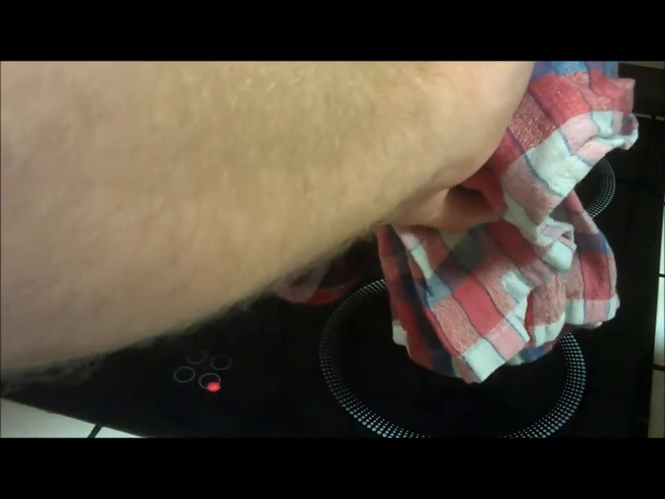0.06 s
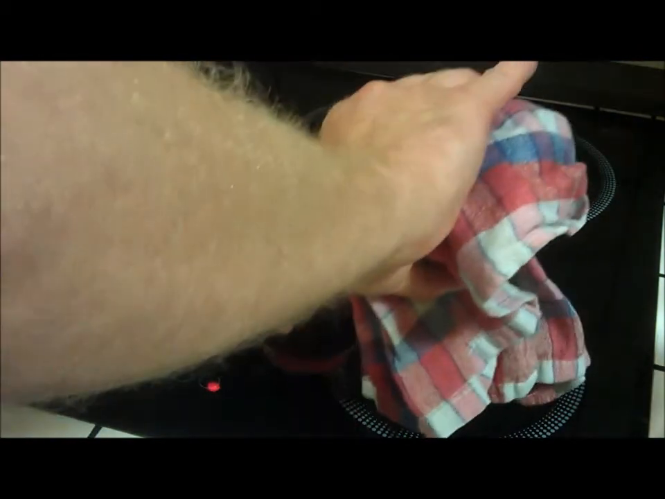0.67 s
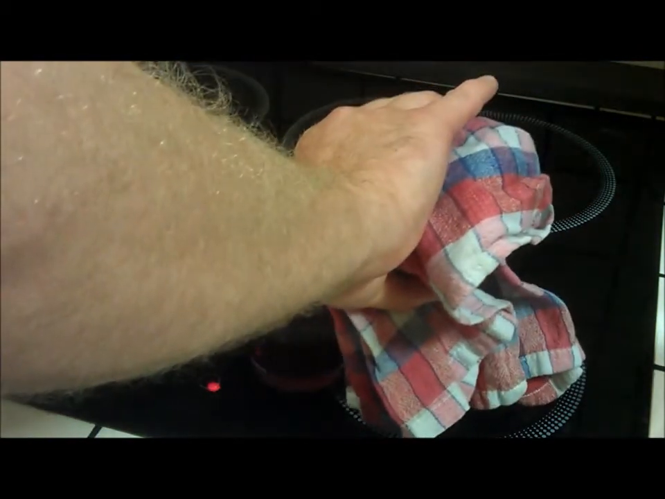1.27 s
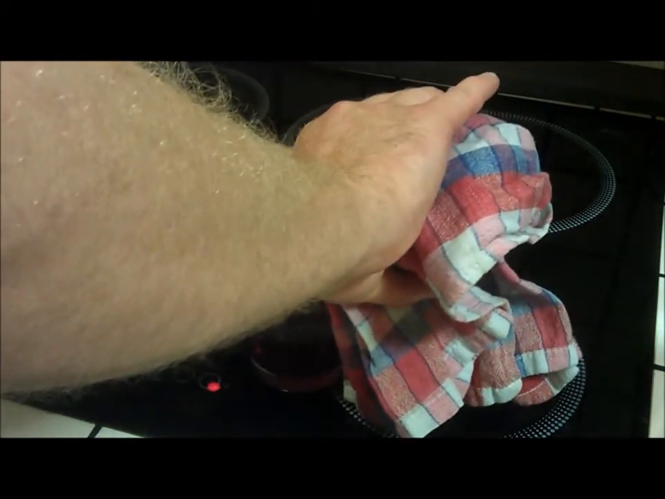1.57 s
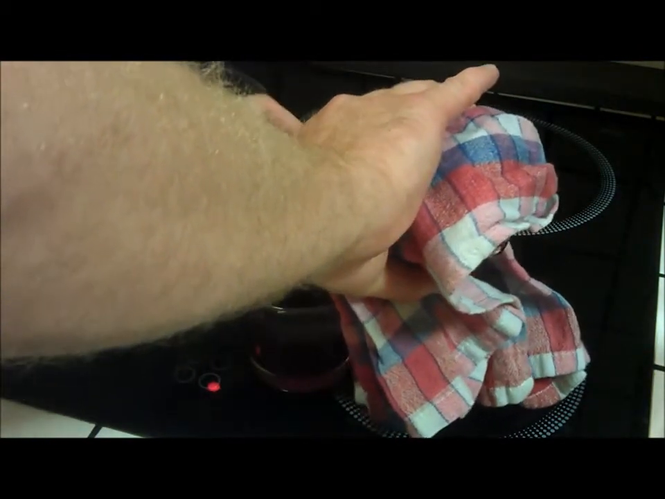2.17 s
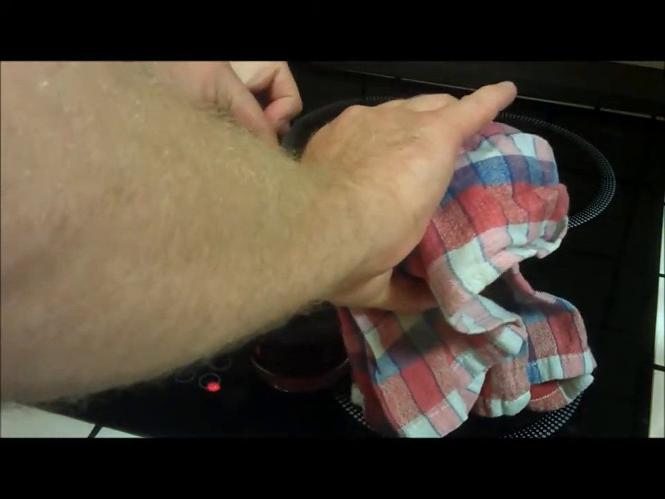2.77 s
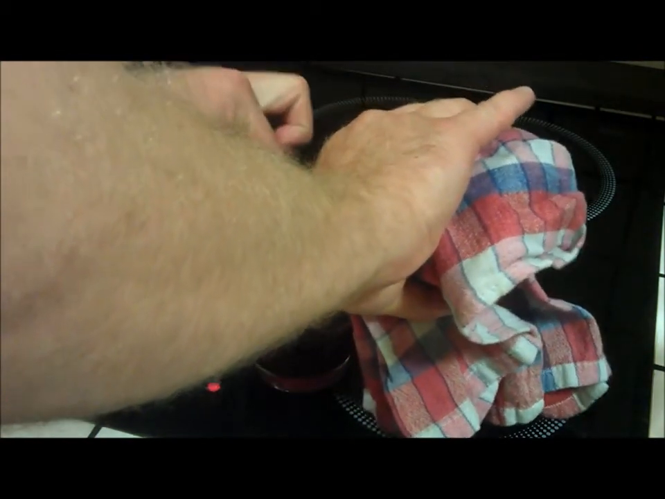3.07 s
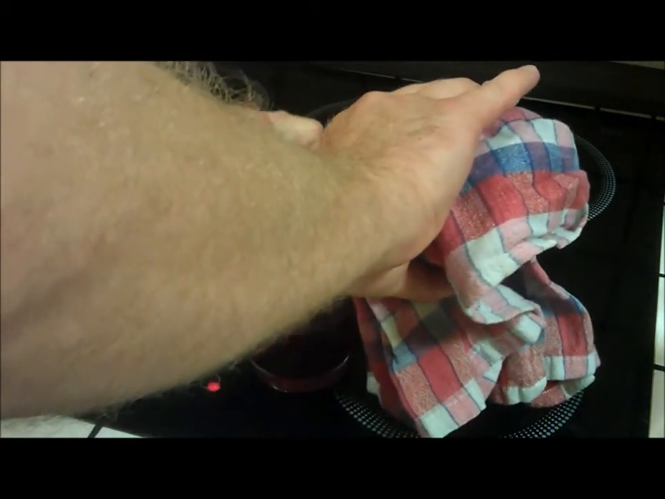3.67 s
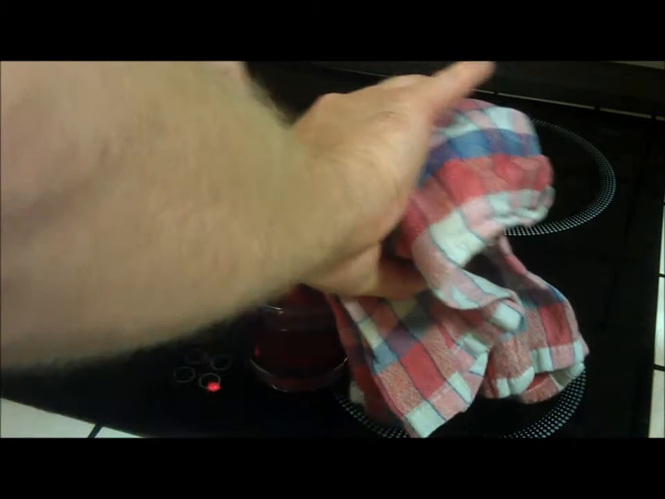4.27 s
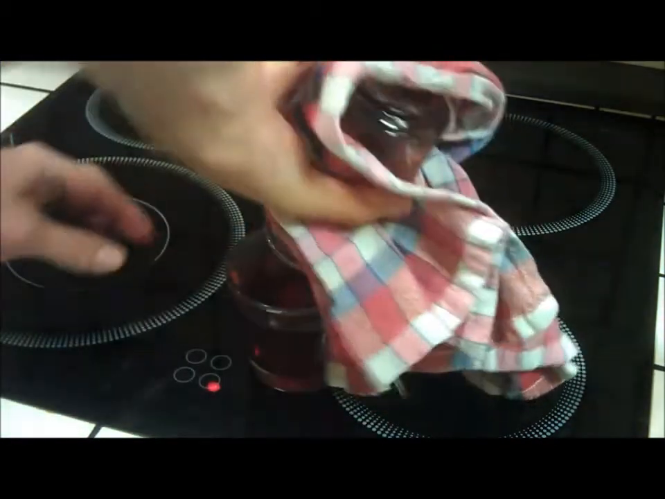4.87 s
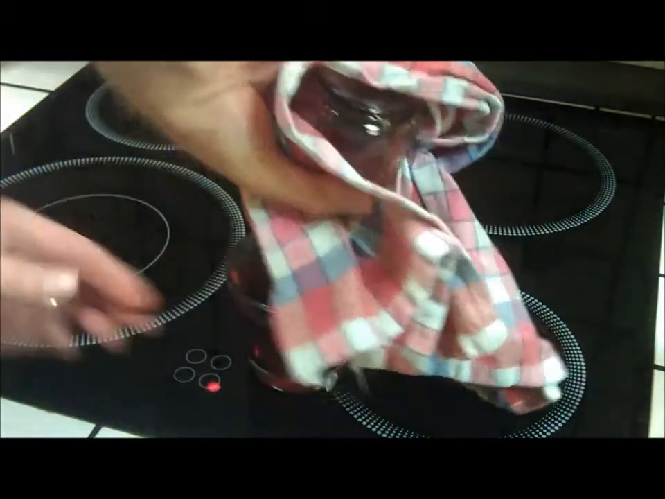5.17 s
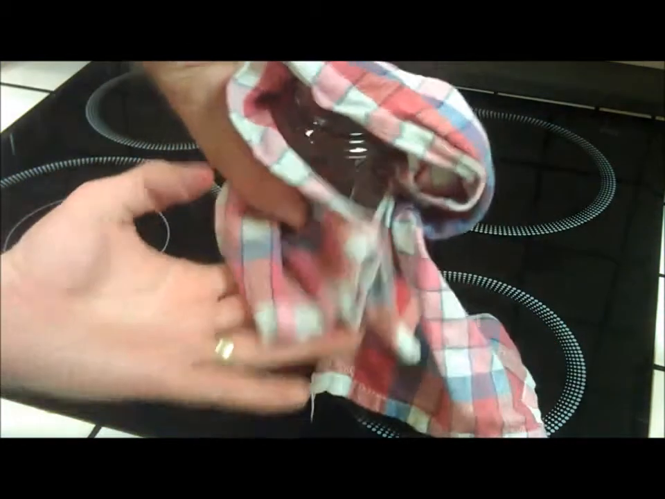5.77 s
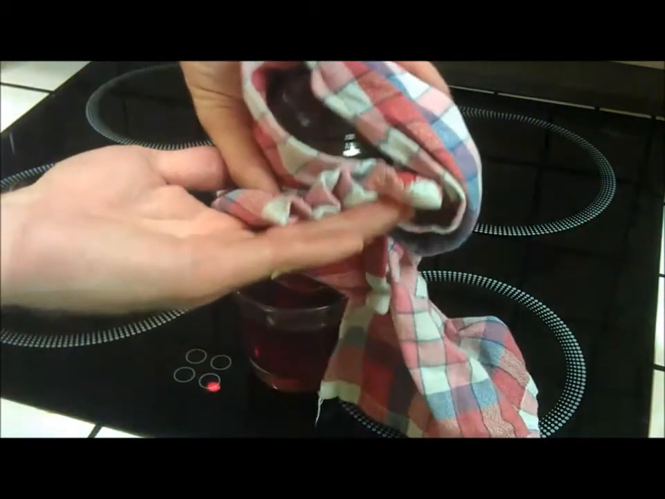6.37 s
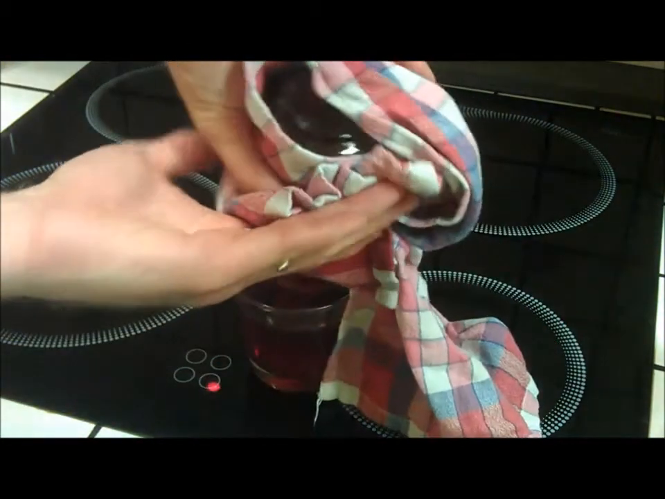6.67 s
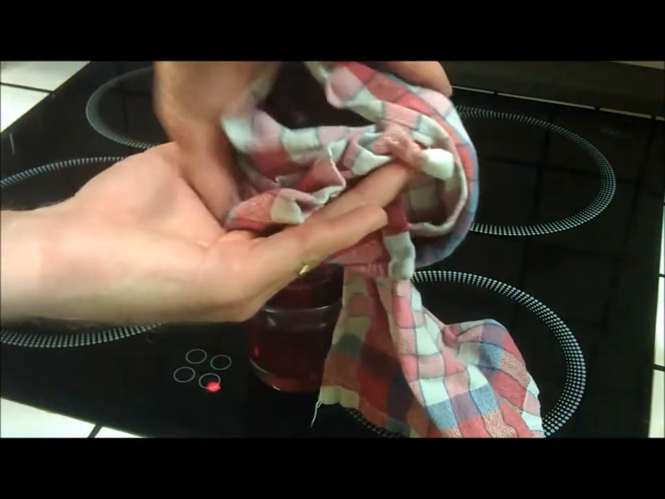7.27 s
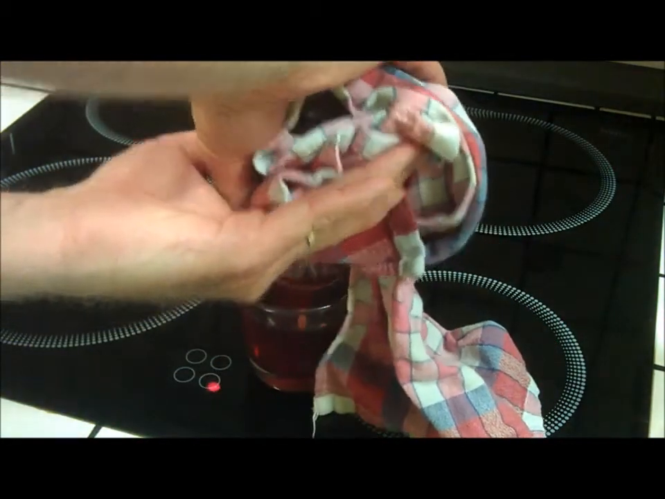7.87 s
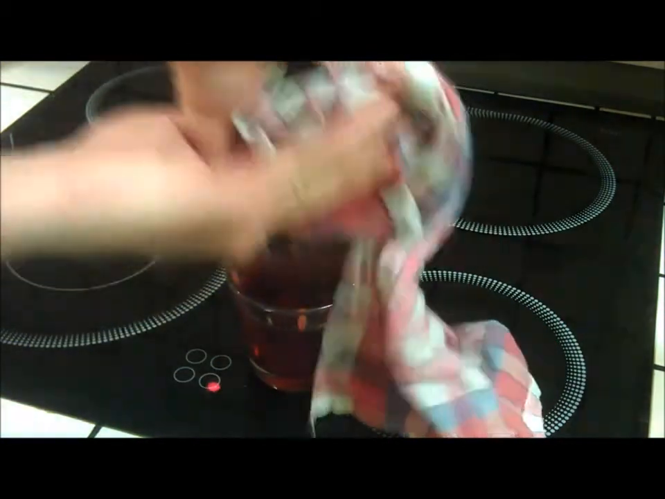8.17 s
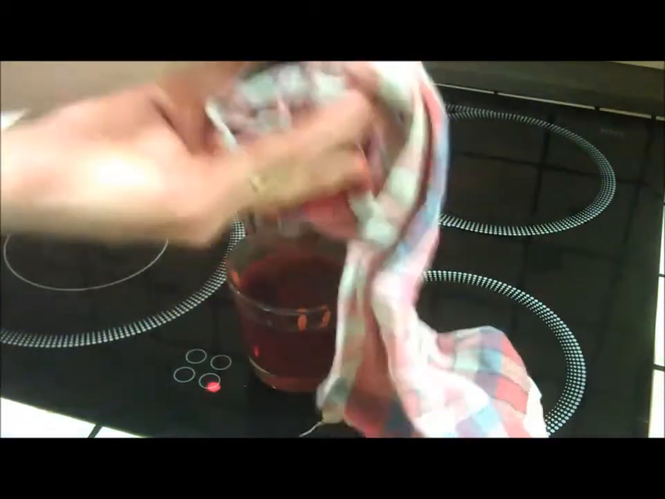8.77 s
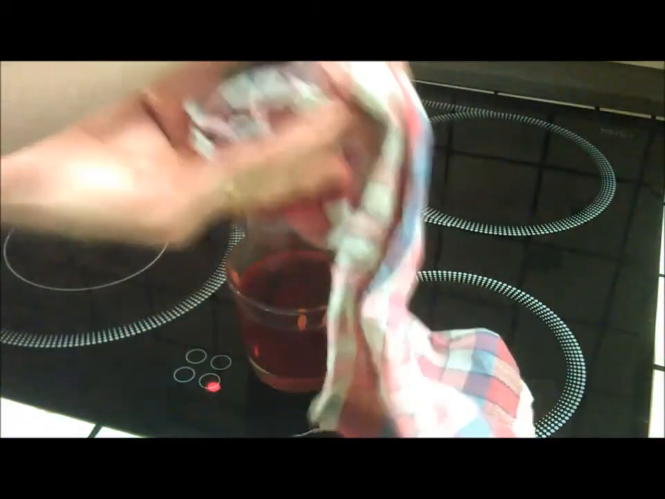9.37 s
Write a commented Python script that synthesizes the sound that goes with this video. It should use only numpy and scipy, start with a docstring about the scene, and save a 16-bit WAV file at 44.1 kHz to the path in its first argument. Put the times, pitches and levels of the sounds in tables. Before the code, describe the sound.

A close stereo microphone in a small kitchen picks up faint hiss and electric hum throughout. After a light tap at 0.5 seconds, a glass knocks sharply on a glass-ceramic cooktop at 1 second, both ringing briefly, with a duller settling knock right after. A few light, ringing clinks come at 2.7 seconds, then a low thud with a little glass ring at 3.3. A very soft hand rub follows just before 4 seconds. From about 4.3 seconds a cloth towel is pulled around a glass, its crinkling rustle strongest around 4.7 to 5.1, then thinning out by 7.3. The twisting cloth ticks and creaks from 5.1 seconds, with three tiny high squeaks near 6.1 and stronger short creaks from 6.8 to 8.3. Small clusters of hard, light glass clicks sound at 8.7 and 9.6 seconds.

```python
"""Glassware knocks on a glass-ceramic cooktop, ringing panel and glass: one sharp blow, a duller settling
knock, a later thud and a few light clinks. Then a cloth towel is pulled and twisted round a glass:
sliding folds rustle and crinkle, skidding threads squeak, stick-slip makes ticks and creaks.
Small kitchen, close stereo microphone, faint hum and hiss underneath."""
import sys
import numpy as np
from scipy import signal
from scipy.fft import rfft, irfft, next_fast_len
from scipy.io import wavfile
from scipy.ndimage import map_coordinates

SR = 44100
rng = np.random.default_rng(int(sys.argv[2]) if len(sys.argv) > 2 else 0)


def master_out(mix):
    """Clip the mix to full scale and print it as 16-bit PCM to the path in sys.argv[1]."""
    frames = np.transpose(np.atleast_2d(mix))
    ceiling = np.clip(frames, -1, 1)
    pcm = np.round(ceiling * 32767).astype(np.int16)
    wavfile.write(sys.argv[1], SR, pcm)


N = 425124
TIME_S = np.arange(N) / SR
RING_N = SR * 3 // 4
RING_S = np.arange(RING_N) / SR


# start_s, panel_db, glass_db, contact_cutoff_hz, glass_rattle_t60_s, favoured_mode_hz
BLOWS = [(0.994, -18.5, -9, 11000, 0.147, 700), (1.0103, -37.5, -17, 10000, 0.108, 420),
         (1.125, -21, -26.5, 4530, 0.274, 895), (3.2686, -14, -70, 136, .2, 303),
         (3.2737, -32.5, -29.5, 4600, 0.16, 700)]
# pitch_hz, level_db, t60_s
PANEL_MODES = [(225.9, -15, 0.495), (273.3, -10, 0.275), (303.7, -7, 0.42), (421.7, -8, 0.18),
               (701, -11, 0.172), (894.3, -4.5, 0.173), (1183, -14, 0.18)]
GLASS_MODES = [(1486, 0, .22), (1725, -1.5, .15), (1765, -3, .18), (1985, -5, .2), (2230, -6, .25),
               (2536, 1, .22), (2685, -1, .24), (2752, -2, .2), (2977, -7, .28), (3835, -3, .14),
               (4212, -2, .17)]
# dense, fast-fading modes: freq_hz, density_db
PANEL_SPECTRUM = [(60, -20.5), (130, -16.5), (260, 6), (560, -4.5), (900, 0.5), (1400, -1), (3000, -42)]
GLASS_SPECTRUM = [(300, -33.5), (850, -10.5), (1250, -9.5), (1650, 1), (2500, 4.8), (3300, -4), (4200, -3),
                  (5200, -10), (7500, -15), (8700, -22.5), (10500, -14.5), (13500, -30)]
# freq_hz, side_db
BLOW_WIDTH = [(150, -26), (280, -33), (480, 5), (900, 1.5), (2000, -9), (8000, 2.5)]

def knocks(crack_s=0.00476, push_db=20, rattle_db=-5, panel_ring_db=-10, glass_ring_db=-20):
    """Each blow shakes the panel and the glass; a softer contact is duller."""
    out = np.zeros((2, N))
    crack = 1 / (1 + (RING_S / crack_s) ** 6)  # rim chatter
    push = amp(push_db) * pulse(PANEL_SPECTRUM)  # panel gives once
    for start_s, panel_db, glass_db, cutoff_hz, rattle_s, favoured_hz in BLOWS:
        panel = amp(rattle_db) * noise(PANEL_SPECTRUM, RING_N) * fade(0.23)
        panel += amp(panel_ring_db) * modes(PANEL_MODES, favoured_hz=favoured_hz)
        glass = noise(GLASS_SPECTRUM, RING_N) * (crack + amp(rattle_db) * fade(rattle_s))
        glass += amp(glass_ring_db) * modes(GLASS_MODES, scatter_db=0.5)
        blow = amp(panel_db) * (push + panel * (1 - fade(0.0114))) + amp(glass_db) * glass
        blow = signal.lfilter(*signal.butter(2, cutoff_hz, fs=SR), blow)
        add(out, start_s, kitchen(stereo(blow, BLOW_WIDTH), wet_db=-7))
    return out


def modes(table, scatter_db=0, favoured_hz=None, favour_db=6.5, span_ratio=0.08):
    """Damped modes at random phases; the place struck may favour one."""
    hz, db, t60_s = np.transpose(table)[:, :, None]
    if favoured_hz:
        db = db + favour_db * np.exp(-(np.log(hz / favoured_hz) / span_ratio) ** 2)
    gain = amp(db + scatter_db * rng.standard_normal((2, len(table), 1)))
    phase = rng.uniform(0, 2 * np.pi, gain.shape)
    return np.sum(gain * np.sin(2 * np.pi * hz * RING_S + phase) * fade(t60_s), axis=1)


# start_s, level_db, scrape_t60_s, spot
TOUCHES = [(0.032, -40.5, 0.127, "soft"), (0.5407, -32.5, 0.0358, "dry"), (2.678, -27, 0.0485, "singing"),
           (2.697, -39.5, 0.053, "singing"), (2.708, -30.5, 0.054, "singing"),
           (2.78, -43.5, 0.21, "singing"), (8.6573, -30.5, 0.026, "hard"), (8.688, -29.5, 0.031, "hard"),
           (8.6993, -27.5, .03, "hard"), (9.585, -25.5, 0.017, "hard"), (9.593, -31.5, 0.042, "hard"),
           (9.628, -30.5, 0.023, "hard")]
# per spot: pitch_hz, bandwidth_hz, level_db
SPOT_RESONANCES = {"soft": [(1700, 120, -1.5), (2018, 203, 1.5)], "dry": [(1230, 183, 0), (2190, 236, 8.5),
                   (4564, 287, 8), (11000, 880, -6.5)], "singing": [(1634.4, 80, 8.5), (4207, 96, -1.5),
                   (5964, 113, -3), (7550, 180, -9), (10260, 1000, -5.5), (12400, 1060, -5)],
                   "hard": [(2254, 1530, 2.5), (3790, 1060, 4.5), (7050, 260, -1.5), (10590, 1090, 5)]}
# per spot: strike_over_scrape_db
STRIKE_DB = {"soft": -17.5, "dry": 1.5, "singing": 2, "hard": 0}

def clinks(tick_db=-3.5):
    """Light touches: a tiny strike and a brief scrape ring a few resonances."""
    out = np.zeros((2, N))
    for start_s, level_db, t60_s, spot in TOUCHES:
        scrape_norm = np.linalg.norm(fade(t60_s))
        touch = rng.standard_normal((2, RING_N)) * fade(t60_s)
        touch[0, 0] = amp(STRIKE_DB[spot]) * scrape_norm
        ring = filtered(touch, lambda hz: resonances(SPOT_RESONANCES[spot], hz))
        ring *= scrape_norm / np.linalg.norm(ring, axis=1, keepdims=True)
        tick = amp(tick_db) * noise([(100, -20), (1200, -7)], RING_N) * fade(0.01985)
        add(out, start_s, amp(level_db) * (ring + tick) * (1 - fade(0.00445)))
    return kitchen(stereo(out, [(1600, -6), (10000, -1.5)]), wet_db=-4.5)


# one long pull easing into a slide: time_s, level_db
PULL_LEVEL = [(4.25, -78.5), (4.36, -52), (4.47, -49.5), (4.6, -48.5), (4.655, -40.5), (4.92, -40),
              (4.99, -45.5), (5.07, -40.5), (5.12, -46), (5.28, -49.5), (5.78, -56), (5.84, -62),
              (6.45, -58), (7.2, -60), (7.3, -71.5)]
# centre_s, length_s
PULL_SNAGS = [(4.775, 0.032), (4.85, 0.024), (5.104, 0.0326), (5.262, 0.1014), (5.391, 0.054),
              (5.537, 0.076)]
# hiss grows as the weave closes on the glass: time_s, hiss_over_pull_db
PULL_HISS = [(4.45, -14), (4.7, -1), (5.5, -2), (6.6, 2)]
# light brushes, hiss only: start_s, end_s, level_db
FOLD_BRUSHES = [(2.768, 2.839, -52), (5.025, 5.089, -44), (5.608, 5.665, -42), (5.708, 5.781, -48),
                (6.022, 6.1, -49), (6.136, 6.252, -50.5), (6.615, 6.641, -45.5), (8.236, 8.282, -55),
                (8.688, 8.711, -40.5)]

def rustle(snag_db=-14.5, catch_db=2.5, catches_per_s=110):
    """Towel folds slide over each other and the glass, catching as they go."""
    snagged = sum(stroke(centre_s - length_s / 2, centre_s + length_s / 2, edge_s=0.0274)
                  for centre_s, length_s in PULL_SNAGS)
    pull_db = np.interp(TIME_S, *np.transpose(PULL_LEVEL), left=-np.inf, right=-np.inf)
    pull = amp(pull_db + snag_db * snagged)
    brushes = sum(amp(db) * stroke(start_s, end_s, edge_s=0.0104) for start_s, end_s, db in FOLD_BRUSHES)
    hiss_share = amp(np.interp(TIME_S, *np.transpose(PULL_HISS)))
    hiss = np.hypot(pull * hiss_share, brushes)
    cloth = pull * fibres() + hiss * crinkles()
    return cloth * amp(catch_db * wobble(catches_per_s))


# freq_hz, density_db
CLOTH_SPECTRUM = [(60, -30.5), (1200, -9.5), (1650, -1.2), (2600, 3), (4300, 1), (9000, -10)]

def fibres(snaps_per_s=900, hiss_db=2):
    """Thread snaps of uneven size over a smooth hiss."""
    snaps = (rng.random(N) < snaps_per_s / SR) * rng.uniform(-0.91, 1, (2, N))
    return coloured(unit(snaps) + amp(hiss_db) * rng.standard_normal((2, N)), CLOTH_SPECTRUM)


# freq_hz, density_db
THREAD_SPECTRUM = [(2500, -35.5), (5300, -6), (7700, -2), (8800, -12.5), (9600, -1.5), (10700, 3),
                   (12000, -3), (13800, -15.5)]

def crinkles(count=9000, low_hz=4500, high_hz=13500, t60_s=0.00287, spread_db=2.9, hiss_db=-0.5):
    """Tiny creases flick over, each with its own pitch, size and side, over a smooth hiss."""
    when, pitch, chance, side = rng.random((count, 4)).T[:, :, None]
    t = RING_S[:SR // 100]
    pitch_hz = low_hz + (high_hz - low_hz) * pitch
    gain = amp(-spread_db * np.log(1 - chance))
    flicks = gain * np.sin(2 * np.pi * pitch_hz * t) * fade(t60_s)[:len(t)]
    index = (when * N).astype(int) + np.arange(len(t))
    mid_side = [unit(np.bincount(index.ravel(), part.ravel(), N)[:N])
                for part in (flicks, flicks * (side - .5))]
    return coloured(mid_side + amp(hiss_db) * rng.standard_normal((2, N)), THREAD_SPECTRUM)


# start_s, level_db, treble_db
SINGLE_SLIPS = [(5.268, -35, -1), (5.312, -32, -2.5), (5.786, -45, 7), (6.941, -31, -9.5),
                (6.9687, -27.5, -16.5), (7.195, -33.5, -14.5), (7.438, -37.5, -5), (7.9219, -25.5, -13),
                (8.061, -30.5, -12), (8.3036, -30, -6.5), (8.58, -40, 0)]
# start_s, end_s, slips_per_s, level_db, treble_db
CREAK_RUNS = [(5.139, 5.228, 72.5, -38.5, 1.5), (5.323, 5.364, 115.5, -34.5, -2),
              (5.4117, 5.426, 147, -35.5, 0), (5.465, 5.5, 120, -42.5, 6.5), (5.579, 5.594, 125, -34.5, -2),
              (5.843, 5.921, 95, -44, 3.5), (6.8383, 6.89, 101.8, -31.5, -17.5),
              (7.004, 7.029, 215.6, -31.5, -10), (7.115, 7.129, 253, -34, -7),
              (7.396, 7.415, 75.6, -32, -7), (7.803, 7.854, 85, -35.5, -7.5),
              (7.867, 7.906, 90.3, -27, -13.5), (7.939, 7.963, 119.6, -25, -13.5),
              (7.961, 8.006, 210, -27, -11.5), (8.116, 8.148, 72.5, -24, -12.5)]

def twisting(slip_trim_db=-7, creak_trim_db=-7.5, jitter_ratio=0.06, swell_db=2):
    """The twisted towel sticks and slips, singly or in creaking runs."""
    out = np.zeros((2, N))
    for start_s, level_db, treble_db in SINGLE_SLIPS:
        add(out, start_s, slip(level_db + slip_trim_db, treble_db))
    for start_s, end_s, slips_per_s, level_db, treble_db in CREAK_RUNS:
        at_s = start_s
        while at_s < end_s:
            progress = (at_s - start_s) / (end_s - start_s)
            effort = np.sin(np.pi * progress ** 2)  # slow build, quick release
            add(out, at_s, slip(level_db + creak_trim_db + swell_db * effort, treble_db))
            at_s += np.exp(jitter_ratio * rng.standard_normal()) / slips_per_s
    return out


# freq_hz, density_db
SLIP_SPECTRUM = [(130, -50.5), (280, -8.5), (450, -22), (770, -3.5), (1100, -3.5), (1600, 1), (2450, 5.8),
                 (3200, -2), (4100, 1.5), (6000, -10), (8500, -27.5)]

def slip(level_db, treble_db, snap_db=12, threads_db=6, detune_ratio=0.047):
    """Taut cloth lets go with a snap and a dry fuzz; each slip's tension shifts its pitch."""
    size = SR // 40
    fuzz = (fade(0.01517) * (1 - fade(0.00323)))[:size]
    tick = np.zeros((2, size))
    body = np.array(SLIP_SPECTRUM) * [np.exp(detune_ratio * rng.standard_normal()), 1]
    for spectrum, db in (body, level_db), (THREAD_SPECTRUM, level_db + treble_db + threads_db):
        add(tick, 0, amp(db) * noise(spectrum, size) * fuzz)
        add(tick[:1], 0, amp(db + snap_db) * pulse(spectrum))
    return tick


# centre_s, first_hz, last_hz, level_db
SQUEAK_GLIDES = [(6.036, 5400, 7340, -43.5), (6.097, 8150, 5420, -48.5), (6.161, 5010, 8130, -42)]

def squeaks(length_s=0.0081):
    """Threads skid over glass faster or slower, so each tiny whistle glides."""
    out = np.zeros((2, N))
    progress = np.linspace(0, 1, round(length_s * SR))
    for centre_s, first_hz, last_hz, level_db in SQUEAK_GLIDES:
        phase = 2 * np.pi * np.cumsum(first_hz + (last_hz - first_hz) * progress) / SR
        whistle = np.array([np.sin(phase), np.cos(phase)])
        add(out, centre_s - length_s / 2, amp(level_db) * np.sin(np.pi * progress) * whistle)
    return out


def handling(level_db=-57.5, start_s=3.703, length_s=0.347):
    """A hand shifts its grip: a soft low rub with two hollow resonances."""
    spectrum = [(90, -19.5), (160, -4.5), (185, 7), (207, -3.5), (230, 7), (270, -3), (900, -33.5)]
    progress = np.clip((TIME_S - start_s) / length_s, 0, 1)
    return amp(level_db) * np.sin(np.pi * progress) * noise(spectrum, N)[0]


# freq_hz, t60_s
TAIL_DECAY = [(150, 0.484), (700, 0.316), (2500, 0.351), (6000, 0.51), (12000, 0.232)]
# freq_hz, side_db
TAIL_WIDTH = [(200, -10.5), (450, -0.5)]
# delay_s, level_db
WALL_ECHOES = [(.0083, -12.5), (0.0215, -14)]

def kitchen(x, wet_db):
    """Direct sound, echoes from near walls and a diffuse tail."""
    hz, t, bins = signal.stft(rng.standard_normal((2, RING_N)), SR, nperseg=256)
    decay = np.exp(-np.log(1000) * t / along(TAIL_DECAY, hz)[:, None])
    tail = signal.istft(bins * decay, SR, nperseg=256)[1][:, :RING_N]
    tail = stereo(tail, TAIL_WIDTH) * (1 - fade(0.009))  # reflections build up
    tail *= amp(wet_db) / np.linalg.norm(tail[0])
    for delay_s, level_db in WALL_ECHOES:
        add(tail, delay_s, amp([level_db]))
    return x + signal.oaconvolve(x, tail, axes=1)[:, :x.shape[1]]


# freq_hz, density_db
HISS_SPECTRUM = [(50, -35), (92, -18.5), (162, -9), (187, -1), (336, -3), (564, -4.5), (720, -1.5),
                 (1200, -6.5), (3790, -6), (7850, -14.5), (13800, -9.5)]
# freq_hz, side_db
HISS_WIDTH = [(60, -3.5), (180, -5.5), (520, -0.5), (1540, -2), (13400, -2)]
# pitch_hz, level_db
HUM_TONES = [(100, -81.5), (400, -77.5)]

def background(hiss_db=-52):
    """Room air and microphone hiss with a faint electric hum."""
    hum = sum(amp(db) * np.sqrt(2) * np.sin(2 * np.pi * hz * TIME_S) for hz, db in HUM_TONES)
    return amp(hiss_db) * stereo(noise(HISS_SPECTRUM, N), HISS_WIDTH) + hum


def amp(db):
    """Decibels to gain."""
    return 10 ** (np.asarray(db) / 20)


def unit(x):
    """Scale to rms 1."""
    return x / np.sqrt(np.mean(x ** 2) + 1e-20)


def fade(t60_s):
    """Decay of 60 dB in t60_s."""
    return np.exp(-np.log(1000) * RING_S / t60_s)


def stroke(start_s, end_s, edge_s):
    """Gate with linear edges centred on start_s and end_s."""
    rise = np.clip((TIME_S - start_s) / edge_s + .5, 0, 1)
    fall = np.clip((end_s - TIME_S) / edge_s + .5, 0, 1)
    return rise * fall


def wobble(knots_per_s):
    """Smooth random curve."""
    knots = rng.standard_normal(int(N * knots_per_s / SR) + 4)
    return map_coordinates(knots, [TIME_S * knots_per_s])


def along(points, hz):
    """Interpolate (freq_hz, value) points on a log axis."""
    point_hz, values = np.transpose(points)
    return np.interp(np.log(hz + 1), np.log(point_hz + 1), values)


def resonances(table, hz):
    """Complex response of parallel band-pass resonators."""
    return sum(amp(db) * 1j * hz * width_hz / (pitch_hz ** 2 - hz ** 2 + 1j * hz * width_hz)
               for pitch_hz, width_hz, db in table)


def filtered(x, response):
    """Apply a complex frequency response."""
    size = x.shape[-1]
    padded = next_fast_len(size + min(size, SR // 4))
    return irfft(rfft(x, padded) * response(np.fft.rfftfreq(padded, 1 / SR)), padded)[..., :size]


def coloured(x, spectrum):
    """Shape by a spectrum, at rms 1."""
    return unit(filtered(x, lambda hz: amp(along(spectrum, hz))))


def noise(spectrum, size):
    """Two independent coloured noises."""
    return coloured(rng.standard_normal((2, size)), spectrum)


def pulse(spectrum):
    """Minimum-phase pulse of energy 1."""
    gain = amp(along(spectrum, np.fft.rfftfreq(RING_N, 1 / SR)))
    cepstrum = irfft(np.log(gain), RING_N)
    cepstrum[1:RING_N // 2] *= 2
    cepstrum[RING_N // 2:] = 0
    shape = irfft(np.exp(rfft(cepstrum)), RING_N)
    return shape / np.linalg.norm(shape)


def stereo(mid_side, width):
    """Mid and side to left and right; width lists freq_hz, side_db."""
    side = filtered(mid_side[1], lambda hz: amp(along(width, hz)))
    return np.array([mid_side[0] + side, mid_side[0] - side])


def add(track, start_s, sound):
    """Mix a sound in at start_s."""
    part = track[:, max(round(start_s * SR), 0):][:, :sound.shape[-1]]
    part += sound[..., :part.shape[-1]]


# freq_hz, left_minus_right_db
MIC_BALANCE = [(100, 6.5), (200, -1), (2000, 2.5), (7000, 0.5), (11500, 7.5)]

def scene():
    """Glass and towel in the kitchen, a little to the left."""
    towel = stereo(rustle() + twisting() + squeaks(), [(300, 2), (2000, -5), (10000, -3.5)])
    mix = knocks() + clinks() + kitchen(towel, wet_db=-2.5) + handling() + background()
    return filtered(mix, lambda hz: amp(np.outer([.5, -.5], along(MIC_BALANCE, hz))))


def record(dry, low_cut_hz=65, top_hz=14000):
    """Soft saturation at full scale, a bass cut and a steep band limit."""
    limited = dry / (1 + dry ** 8) ** (1 / 8)
    thinned = signal.lfilter(*signal.butter(2, low_cut_hz, "high", fs=SR), limited)
    return filtered(thinned, lambda hz: 1 / np.sqrt(1 + (hz / top_hz) ** 400))


dry = scene()
out = record(dry)
master_out(out)
```